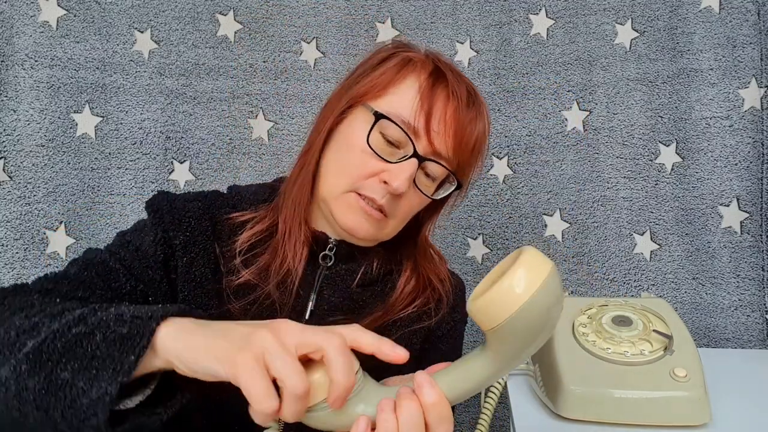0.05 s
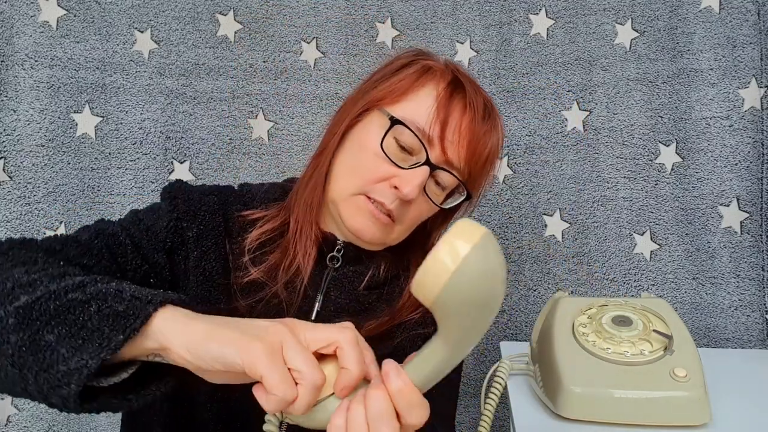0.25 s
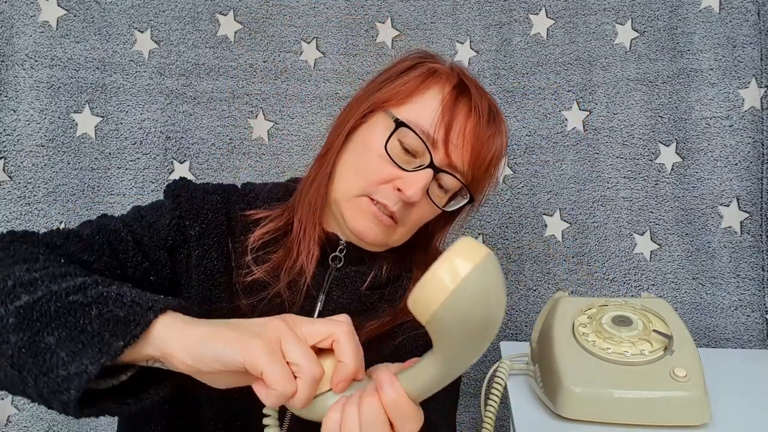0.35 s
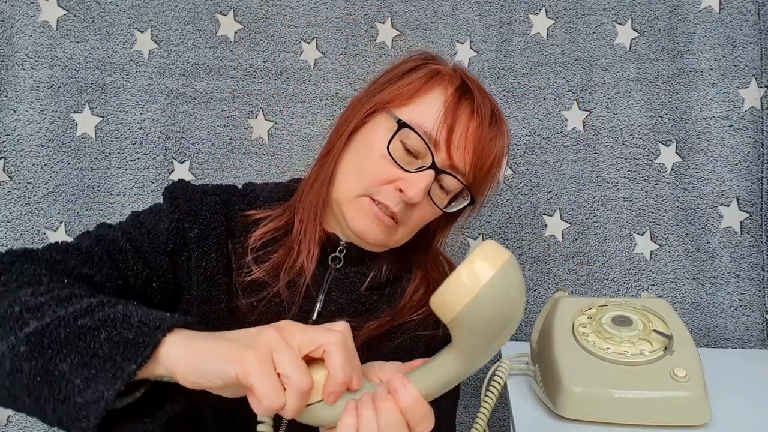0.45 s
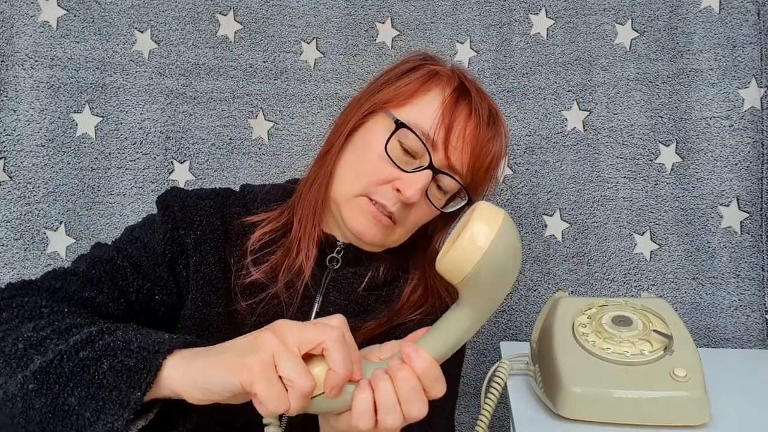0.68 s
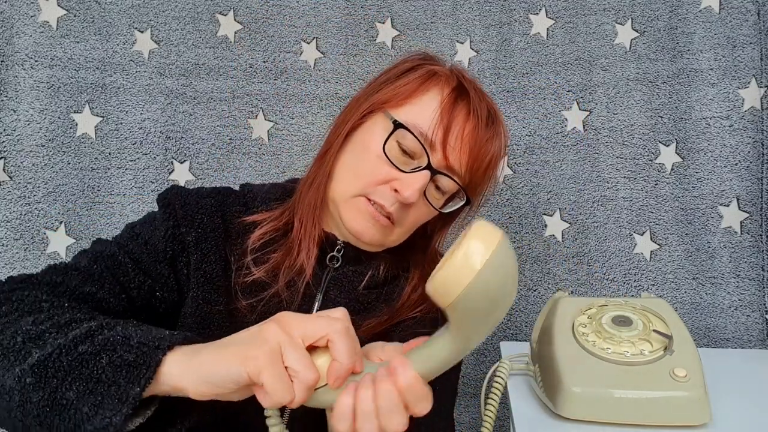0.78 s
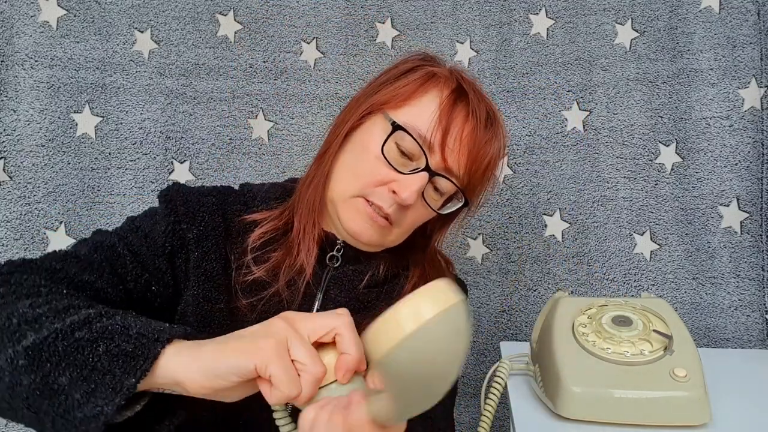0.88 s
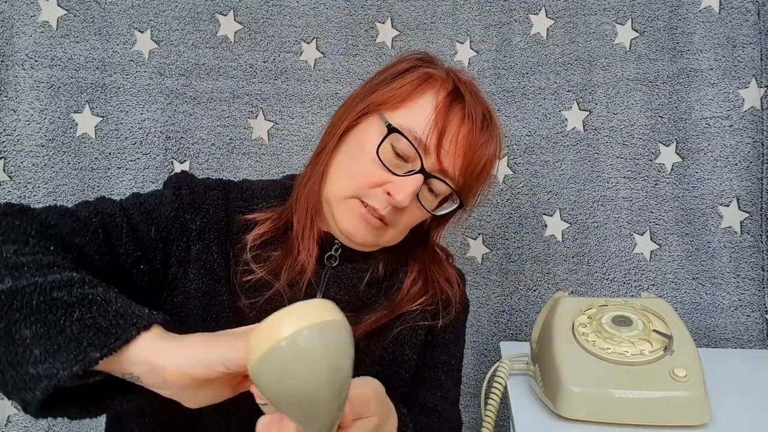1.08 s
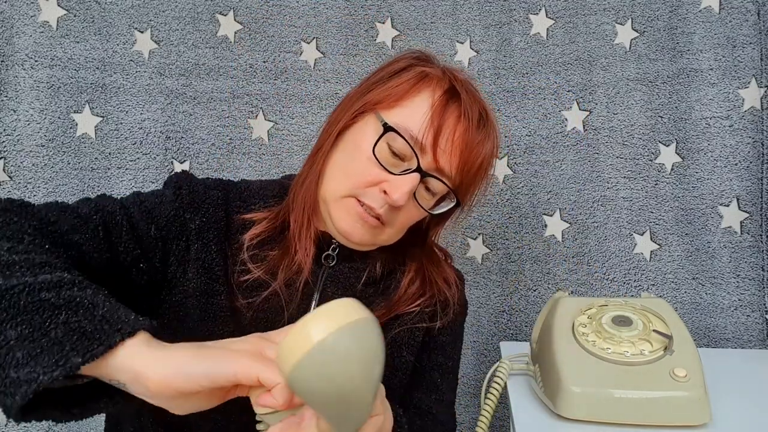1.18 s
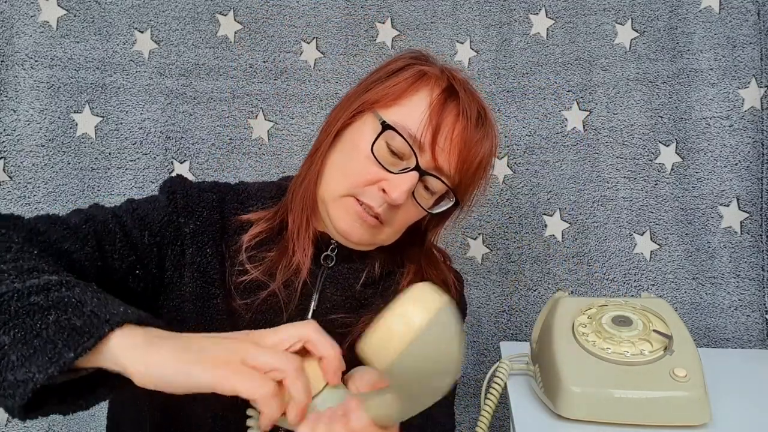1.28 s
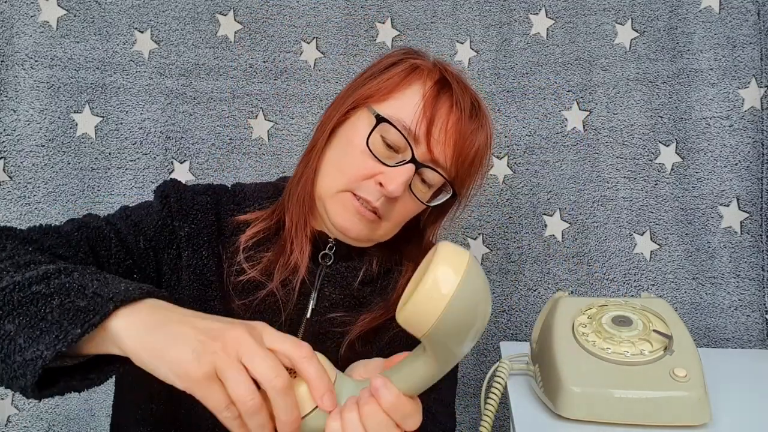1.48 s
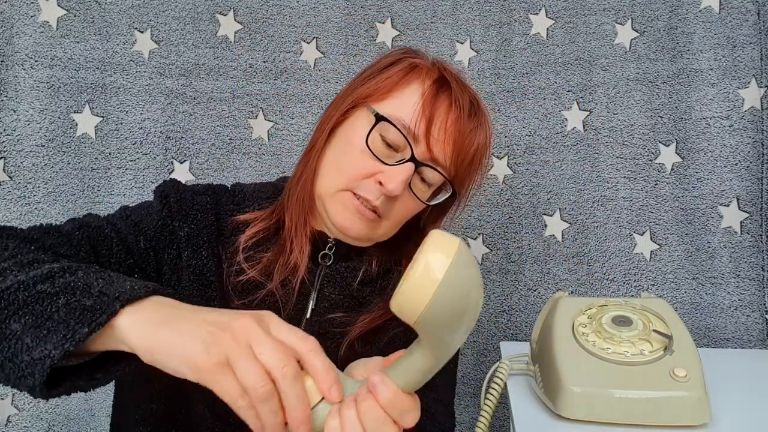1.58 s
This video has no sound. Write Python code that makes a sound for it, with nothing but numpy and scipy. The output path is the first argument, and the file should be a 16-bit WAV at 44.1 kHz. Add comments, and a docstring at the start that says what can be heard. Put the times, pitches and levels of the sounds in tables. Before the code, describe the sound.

The plastic cap of an old telephone handset is twisted by hand, with grainy rubbing from the start. From about 0.2 seconds the thread catches in sharp, hollow clicks, loudest around 0.6 seconds. Another cluster comes at 1.1 to 1.2 seconds, then a few faint ticks until about 1.6 seconds. A low electrical hum and rumble fill the small room throughout.

```python
"""A low mains hum and a rumble fill a small room throughout. From the start, the cap of an old plastic
telephone handset is twisted by hand: its thread rubs with grainy friction, and the room answers briefly.
Then the thread catches and lets go (stick-slip) in sharp clicks, each a few milliseconds of chatter
that rings the cavity, shell and cap. The clicks are loudest near 0.6 s, cluster again near 1.1 s
and end in a few faint ticks."""
import sys
import numpy as np
from scipy import signal
from scipy.fft import rfft, irfft, next_fast_len
from scipy.io import wavfile
from scipy.ndimage import map_coordinates

SR = 44100
rng = np.random.default_rng(int(sys.argv[2]) if len(sys.argv) > 2 else 0)


def materialize(psi):
    """Save the field psi as 16-bit PCM at rate SR to the path in sys.argv[1].

    A 1-D psi becomes a single channel; in a 2-D psi each row is a channel.
    """
    bounded = np.clip(np.atleast_2d(psi).T, -1, 1)
    quanta = np.round(bounded * 32767).astype(np.int16)
    wavfile.write(sys.argv[1], SR, quanta)


N = 72765


def amp(db):
    return 10 ** (np.asarray(db) / 20)


def unit(x):
    return x / np.sqrt(np.mean(x ** 2) + 1e-20)


def along(points, hz):
    """Interpolation of (f/Hz, value) points on a logarithmic frequency axis."""
    f, v = np.transpose(points)
    return np.interp(np.log(hz + 1), np.log(f + 1), v)


def wobble(rate):
    """Smooth random modulation: a spline through rate knots a second."""
    return map_coordinates(rng.standard_normal(4096), [np.arange(N) * rate / SR], mode="wrap")


def filtered(x, response):
    """Linear filtering: the spectrum of x times a frequency response."""
    n = x.shape[-1]
    m = next_fast_len(n + 4096)
    return irfft(rfft(x, m) * response(np.fft.rfftfreq(m, 1 / SR)), m)[..., :n]


def colour(points):
    """Magnitude response through (f/Hz, level/dB) points."""
    return lambda f: amp(along(points, f))


def stereo(pair, width):
    """Mid-side stereo from two signals: the mid has rms 1, the side has rms width."""
    mid, side = unit(pair[0]), width * unit(pair[1])
    return np.array([mid + side, mid - side])


def noise(spectrum, width):
    """Spectrally shaped Gaussian noise in stereo."""
    return stereo(filtered(rng.standard_normal((2, N)), colour(spectrum)), width)


def add(track, sound, start_s):
    """Superposition of a sound on a track."""
    part = track[:, max(round(start_s * SR), 0):][:, :sound.shape[1]]
    part += sound[:, :part.shape[1]]


# Spectrum of the room's rumble: f/Hz, relative level/dB
RUMBLE_SPECTRUM = [(20, -33), (36, -12), (55, 4), (75, 0), (92, -2.5), (106, 3.5), (122, -7), (165, -13),
                   (210, -11), (260, -22.5), (400, -23.5), (800, -73), (2000, -86), (6000, -73.5),
                   (16000, -61)]

def hum_and_rumble():
    """Superposition of a mains tone, slightly modulated in amplitude, and low-frequency room noise."""
    hum_hz, hum_db, waver_db, rumble_db = 48.9, -39.5, 0.7, -42.5
    phase = 2 * np.pi * (hum_hz * np.arange(N) / SR + rng.random())
    hum = np.sqrt(2) * np.sin(phase) * amp(hum_db - waver_db * wobble(rate=6))
    return hum + amp(rumble_db) * noise(RUMBLE_SPECTRUM, width=0.18)


# Spectra of the rubbing thread, the shifting hands and skin on plastic: f/Hz, relative level/dB
THREAD_SPECTRUM = [(100, -30), (190, -42), (250, -2.5), (330, -16.5), (550, -8), (800, -4), (1200, -4),
                   (1500, 0), (1850, -12), (3000, -11.5), (5000, -30), (9000, -37)]
HAND_SPECTRUM = [(45, -24.5), (75, -0.5), (105, 5.5), (135, -8.5), (175, -15.5), (260, -6.5), (400, -24.5),
                 (800, -47)]
SKIN_SPECTRUM = [(1500, -4), (3000, 13.5), (4700, 13), (6500, 6), (11000, 0.5), (16000, -14)]
# Friction envelopes: t/s, relative level/dB of thread and hands, relative level/dB of skin hiss
FRICTION_LEVELS = [(0, -39.5, -57.5), (0.042, -53, -67), (0.133, -60.5, -78), (.175, -45, -68),
                   (0.192, -42, -53), (0.237, -29, -40.5), (0.274, -50, -49), (.32, -37, -60),
                   (.425, -48, -55), (0.462, -39.5, -61), (.51, -35.5, -46), (.565, -46, -59),
                   (0.606, -52, -78), (0.701, -56.5, -52), (.815, -45.5, -53.5), (0.852, -36, -45.5),
                   (.91, -47.5, -46.5), (0.948, -39.5, -45), (1.021, -42.5, -52), (1.06, -50, -59),
                   (1.10, -40, -44), (1.15, -39, -45), (1.185, -55, -61), (1.30, -54, -63),
                   (1.334, -45, -52), (1.37, -52, -59), (1.427, -44, -53.5), (1.48, -62, -85),
                   (1.611, -67.5, -77.5), (1.65, -54.5, -67)]

def rubbing():
    """Sliding friction gives broadband noise: a grainy thread, dull shifting hands and hissing skin."""
    times, body_db, hiss_db = np.transpose(FRICTION_LEVELS)
    t = np.arange(N) / SR
    grain_db = 2.5 * wobble(rate=300)
    friction = stereo(rng.standard_normal((2, N)), width=0.6) * amp(grain_db)
    thread = unit(filtered(friction, colour(THREAD_SPECTRUM)))
    hands = amp(-6) * noise(HAND_SPECTRUM, width=0.15)
    skin = unit(noise(SKIN_SPECTRUM, width=0.93) * amp(grain_db / 2))
    body = (thread + hands) * amp(np.interp(t, times, body_db))
    hiss = skin * amp(np.interp(t, times, hiss_db))
    return amp(-2) * in_room(body + hiss)[:, :N]


# Reverberation time of the diffuse tail: f/Hz, T60/s
TAIL_T60 = [(150, .45), (400, 0.28), (1000, 0.4), (3000, 0.37), (7000, 0.29), (15000, 0.21)]
# Colouring of the tail: f/Hz, relative level/dB
TAIL_SPECTRUM = [(100, -11), (250, -1.5), (380, -1), (520, 0), (800, -3), (1200, -7), (1550, -7),
                 (2200, -5), (3000, -0.5), (3800, -3), (4700, -2.5), (7000, -2), (15000, 3)]
# Early wall reflections: delay t/s, level/dB re the direct sound
REFLECTIONS = [(.0095, -19), (0.011, -16.5), (0.0164, -15), (0.021, -27)]
# Standing waves of the room: f/Hz, initial level/dB, T60/s
STANDING_WAVES = [(257, -57, 0.37), (387, -58, 0.6)]

def in_room(x):
    """Convolution with a room impulse response: direct sound, reflections, diffuse tail and modes."""
    n, onset_s, tail_db = SR // 2, 0.0022, -2
    t = np.arange(n) / SR
    hz, frame_s, bands = signal.stft(rng.standard_normal((2, n)), SR, nperseg=256)
    decay = amp(-60 * frame_s / along(TAIL_T60, hz)[:, None])
    tail = signal.istft(bands * decay, SR, nperseg=256)[1][:, :n]
    tail = unit(tail * (1 - np.exp(-(t / onset_s) ** 2))) / np.sqrt(n)
    spread = lambda f: np.array([np.ones_like(f), f / (f + 800)])  # the bass is nearly mono
    mid, side = filtered(tail, lambda f: amp(tail_db + along(TAIL_SPECTRUM, f)) * spread(f))
    response = np.array([mid + side, mid - side]) / np.sqrt(2)
    for delay, db in REFLECTIONS:
        arrival_s = delay + rng.normal(0, 0.0002, 2)  # left, right
        response[[0, 1], np.round(arrival_s * SR).astype(int)] += amp(db)
    for mode_hz, db, t60 in STANDING_WAVES:
        response += amp(db - 60 * t / t60) * np.sin(2 * np.pi * mode_hz * t)
    response[:, 0] += 1  # direct sound
    return signal.fftconvolve(x, response, axes=1)


def chatter(envelope, blow):
    """Contact excitation: two random forces share an envelope; the first has an impulse at its peak."""
    force = envelope * rng.standard_normal((2, len(envelope)))
    force[0, np.argmax(envelope)] += blow * np.linalg.norm(envelope) / 2
    return force


def ring(force, modes):
    """Modal superposition: a force drives damped resonances, summed with alternating polarity."""
    out = 0
    for k, (hz, bandwidth, db) in enumerate(modes):
        resonance = lambda f: 1j * f * bandwidth / (hz * hz - f * f + 1j * f * bandwidth)
        rolloff = lambda f: np.hypot(1, (f / (2.2 * hz)) ** 2)  # little passes far above the mode
        pair = filtered(force, lambda f: resonance(f) / rolloff(f))
        out += (-1) ** k * amp(db) * np.array([unit(row) for row in pair])
    return out


def antiresonance(f):
    """Antiresonance: the shell hardly radiates in a narrow band below its main mode."""
    hz, bandwidth_hz, depth_db = 1262, 180, -15.5
    detuning, damping = hz * hz - f * f, 1j * f * bandwidth_hz
    return (detuning + damping * amp(depth_db)) / (detuning + damping)


# Modes of the handset's cavity, shell and cap: f/Hz, bandwidth/Hz, relative level/dB
CAVITY_MODES = [(200.5, 27, -7), (265.5, 23, -1), (400, 107, -7)]
SHELL_MODES = [(667, 50, -8.5), (886, 305, -1), (1019, 96, -3.5), (1452, 57, 0), (2000, 96, -7.5)]
CAP_MODES = [(2136, 200, -6.5), (2520, 95, 0.5), (2920, 120, -2), (3326, 190, 1), (4115, 300, -5),
             (4750, 460, -5.5)]
# Spectrum of a click's bright crack: f/Hz, relative level/dB
CRACK_SPECTRUM = [(2500, -17), (4800, 4), (5800, 0), (7000, 2.5), (8000, -2.5), (9200, 0), (11500, -5.5),
                  (14000, -6.5), (15100, -16.5), (16000, -13)]
# Slips of the thread: t/s, rise time/s, strength of the blow relative to the chatter,
# relative level/dB of cavity, shell, cap and crack, contact resonance f/Hz,
# its relative level/dB, stereo width factor
SLIPS = [(0.0539, .0008, 1.1, -65, -42, -44.5, -64, 864, -47, 1),
         (0.153, 0.005, 1.1, -50.5, -39.5, -52, -76, 1420, -40, 0.94),
         (.1812, .0002, 1.4, -67, -46, -46, -64, 2340, -40.5, 1),
         (0.2053, 0.00005, 2.2, -56, -31, -28.5, -40.5, 2966, -24, 1),
         (.2078, .0002, 2, -43, -32, -25, -44, 903, -28.5, 0.56),
         (0.2179, .0005, 1.1, -59, -56, -51, -54, 2960, -43, 0.52),
         (.228, .001, 0.69, -60, -57, -55, -61, 820, -56, 0.51),
         (0.2383, 0.0017, 0.97, -45, -29.5, -46, -48, 1090, -37, 0.35),
         (.246, 0.0017, 1, -59, -35, -41, -59, 1450, -34, .5),
         (0.3266, 0.00057, 1.23, -42.5, -18.5, -20, -37, 5600, -31.5, 1),
         (0.442, 0.0025, .5, -35.5, -25, -25, -33.5, 10800, -42, 0.47),
         (0.4832, .001, 1.3, -39, -25, -33.5, -33, 4100, -30, 0.9),
         (.524, 0.0038, 1.3, -41.5, -29.5, -42, -52, 1064, -33, .4),
         (0.534, .001, 1, -51.5, -36, -43.5, -50, 8900, -45, 0.76),
         (0.5449, 0.00078, 1.5, -36.5, -32.5, -31.5, -38.5, 6870, -33.5, 0.99),
         (0.5456, 0.00037, 1.6, -33, -28.5, -29.5, -37, 1577, -21, 0.87),
         (0.6152, 0.00057, 2.1, -29.5, -22.5, -16.5, -22.5, 4500, -16.5, 0.58),
         (0.6167, .0003, 2, -30.5, -19, -21, -30.5, 1555, -17.5, 0.98),
         (.6528, 0.00083, 2.7, -28.5, -17, -16.5, -23, 1585, -23, 0.64),
         (0.865, 0.0042, 0.47, -38.5, -47, -54, -64, 255, -43, 0.46),
         (0.94, 0.0027, 1.2, -52, -40, -49, -53, 1460, -46.5, 0.62),
         (1.071, 0.0013, 0.65, -52, -30.5, -43.5, -47, 1020, -31.5, 0.51),
         (1.087, 0.0045, 0.76, -47.5, -35, -43, -48, 940, -38, 0.44),
         (1.1055, 0.0016, 2, -36.5, -28, -35, -58, 1574, -23, 0.61),
         (1.1236, 0.00073, 1.3, -40.5, -29.5, -31.5, -45.5, 1578, -22, 0.58),
         (1.1362, 0.0011, 1.91, -32, -27.5, -42, -41.5, 2540, -28.5, 1),
         (1.1947, 0.00056, 1.1, -32.5, -29, -27.5, -36.5, 1510, -22.5, .4),
         (1.1961, 0.00035, 1.63, -31.5, -28, -25.5, -32, 3150, -34.5, 0.85),
         (1.325, 0.00072, 0.42, -69, -39, -45, -48, 1480, -58, 0.9),
         (1.432, .004, 0.28, -54.5, -48.5, -54, -55.5, 780, -41, .4),
         (1.557, .001, 1.34, -53, -61.5, -67.5, -67.5, 1100, -65, 0.8),
         (1.645, 0.0054, .3, -55, -43, -64, -63.5, 1100, -45, .4)]

def clicks():
    """Stick-slip: at each release, chatter builds, holds and dies, ringing cavity, shell and cap."""
    hold_s, chatter_t60_s, contact_q = 0.0021, 0.0092, 17
    lead, n = SR // 50, SR // 12
    t = (np.arange(n) - lead) / SR
    decay = amp(-60 * np.maximum(t - hold_s, 0) / chatter_t60_s)
    gain = np.sqrt(0.004 * SR / n)  # unit rms over the click becomes the energy of 4 ms at unit rms
    out = np.zeros((2, N))
    for at_s, rise_s, blow, cavity_db, shell_db, cap_db, crack_db, contact_hz, contact_db, width in SLIPS:
        envelope = np.exp(np.minimum(t, 0) / rise_s) * decay
        force = chatter(envelope, blow)
        cavity = amp(cavity_db + 4.5) * stereo(ring(force, CAVITY_MODES), 0.2 * width)
        shell = amp(shell_db) * stereo(ring(force, SHELL_MODES), 0.29 * width)
        cap = amp(cap_db) * stereo(ring(force, CAP_MODES), 1.1 * width)
        crack = filtered(chatter(envelope, blow=0.7), colour(CRACK_SPECTRUM))
        crack = amp(crack_db) * stereo(crack, 0.54 * width)
        # Each point of contact favours one resonance.
        contact = ring(chatter(envelope, blow), [(contact_hz, contact_hz / contact_q, 0)])
        contact = amp(contact_db) * stereo(contact, 0.29 * width)
        click = filtered(cavity + shell + cap + crack - contact, antiresonance)
        add(out, in_room(gain * click), at_s - lead / SR)
    return out


def scene():
    """Superposition of all sources; level panning leans the handset's treble slightly to the left."""
    lean = lambda f: amp(np.outer([1, -1], 0.5 * f / 10000))  # +/-0.5 dB at 10 kHz
    return filtered(clicks() + rubbing(), lean) + hum_and_rumble()


def record(dry):
    """Band limiting: a steep low-pass removes the treble above the cutoff."""
    cutoff_hz = 16000
    return filtered(dry, lambda f: 1 / np.sqrt(1 + (f / cutoff_hz) ** 140))


dry = scene()
out = record(dry)
materialize(out)
```